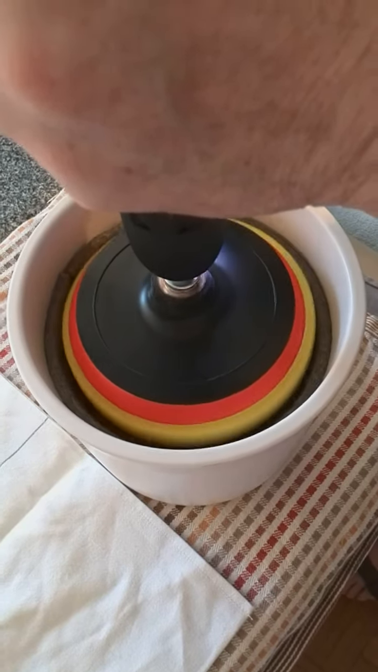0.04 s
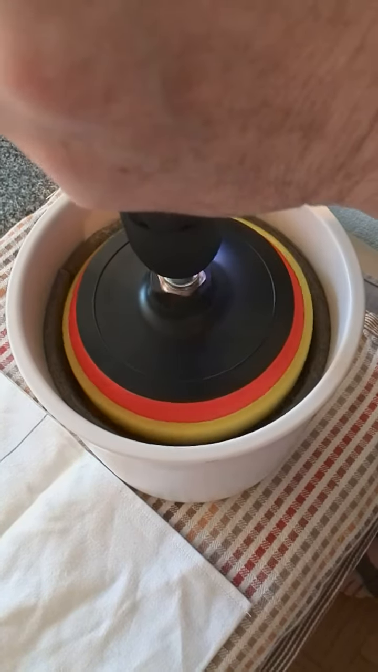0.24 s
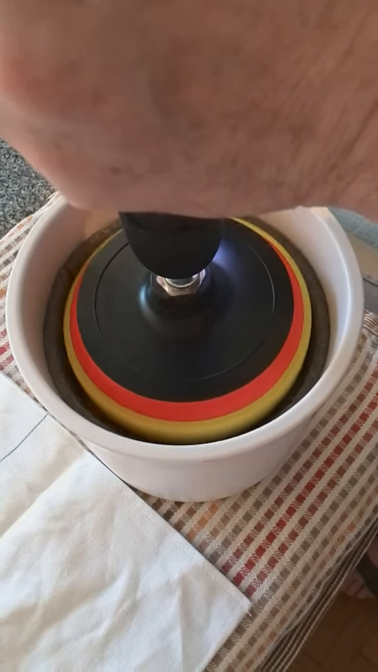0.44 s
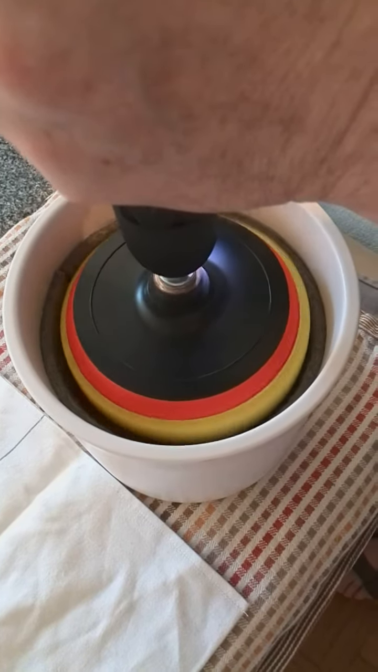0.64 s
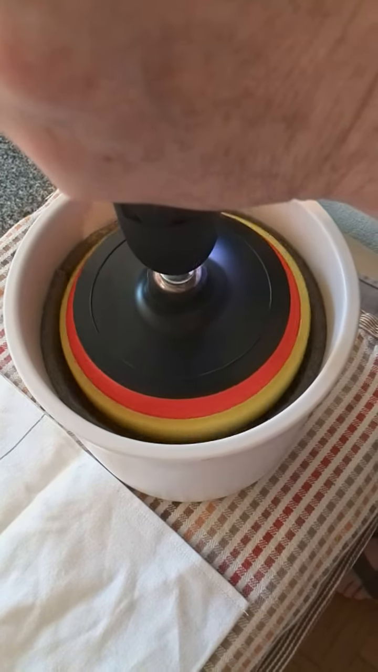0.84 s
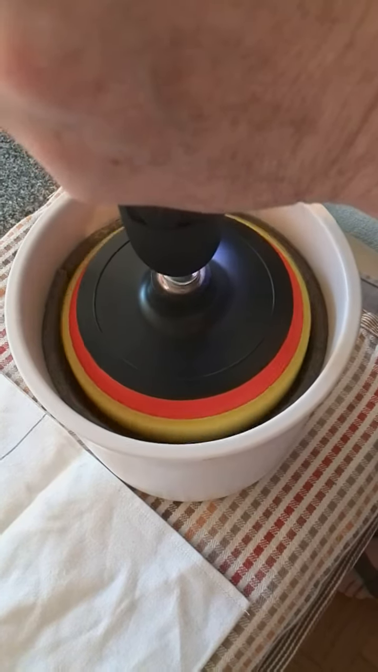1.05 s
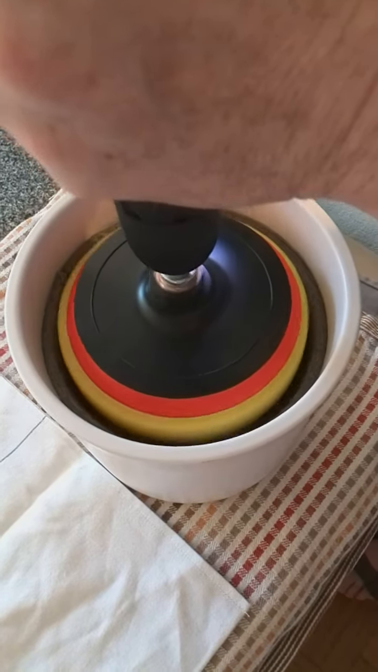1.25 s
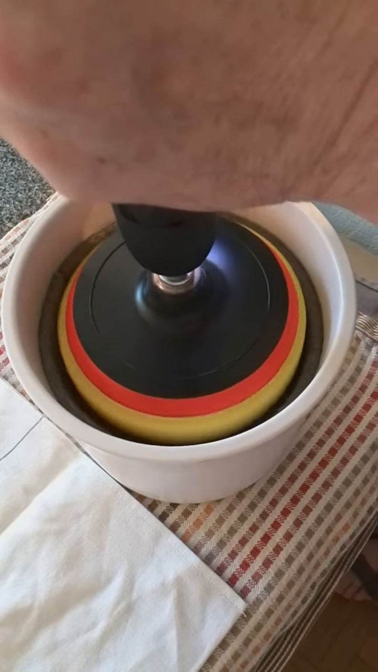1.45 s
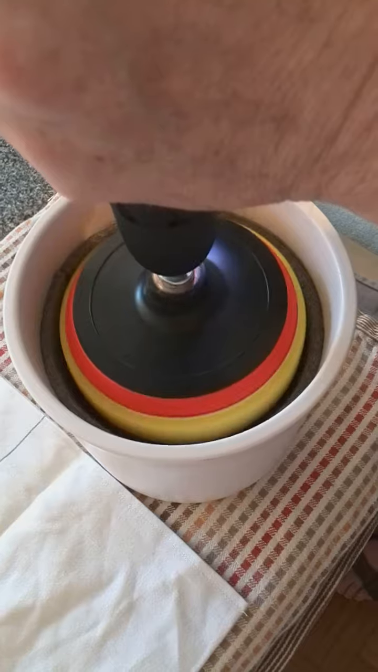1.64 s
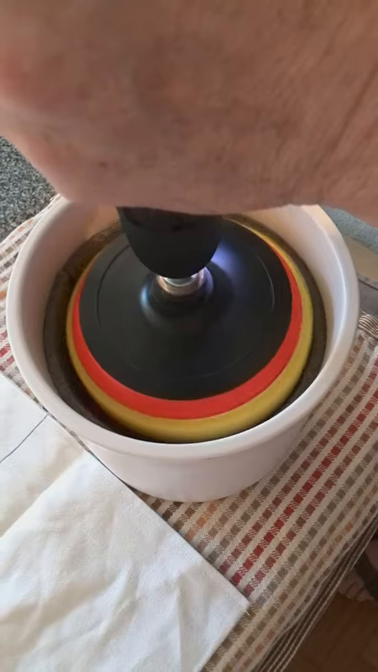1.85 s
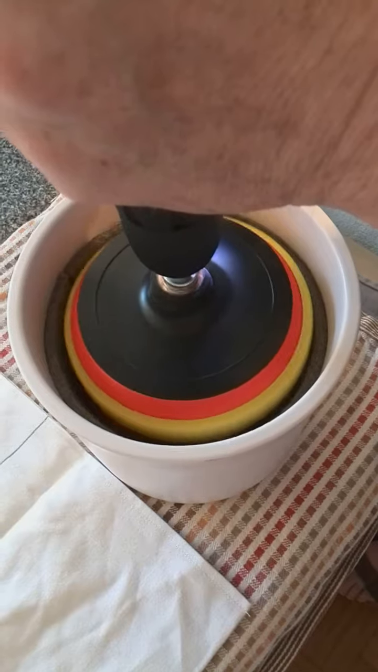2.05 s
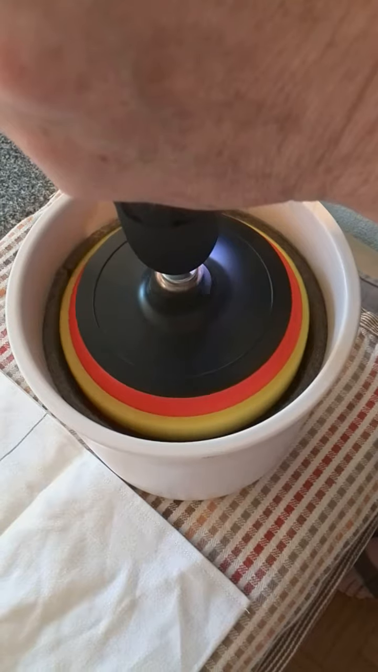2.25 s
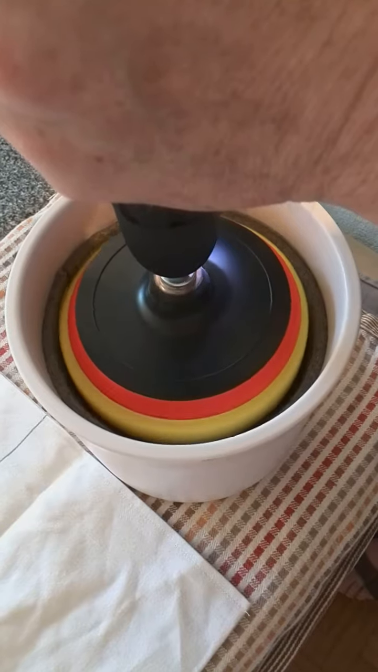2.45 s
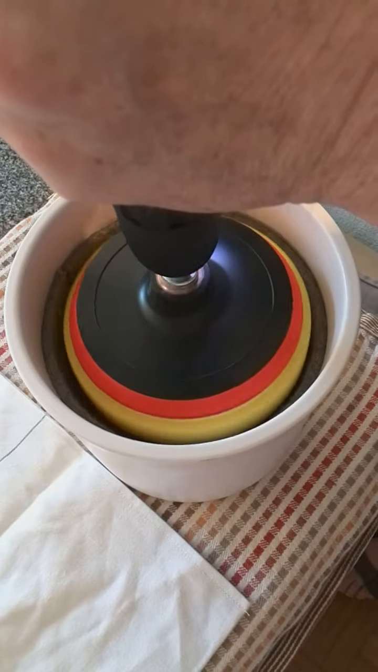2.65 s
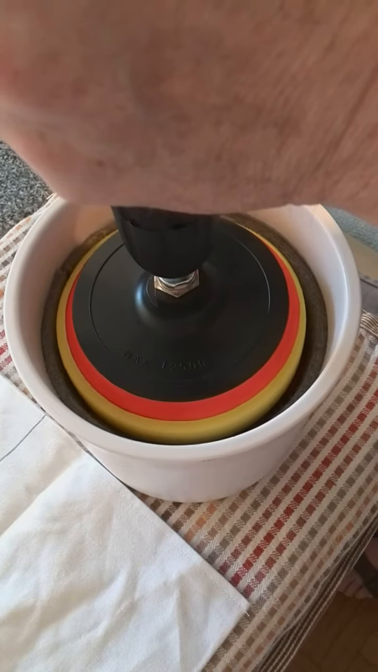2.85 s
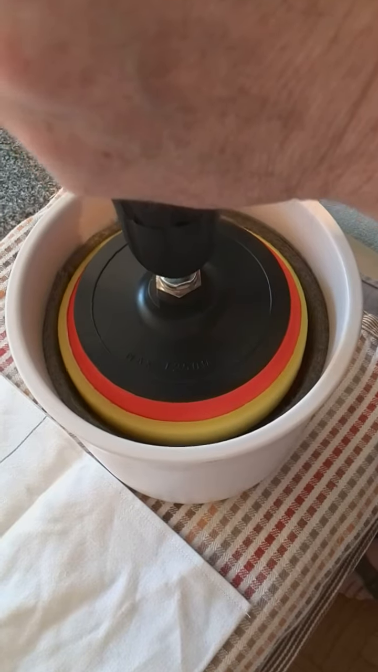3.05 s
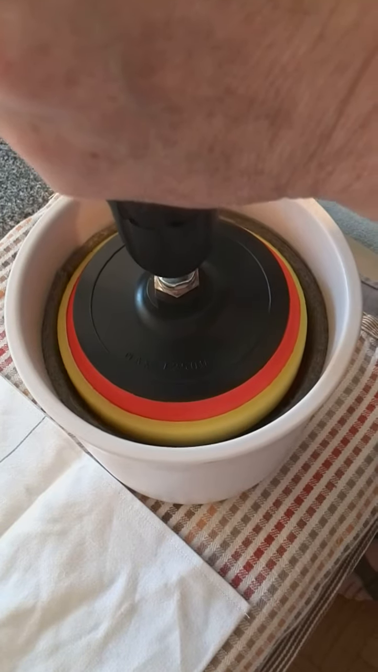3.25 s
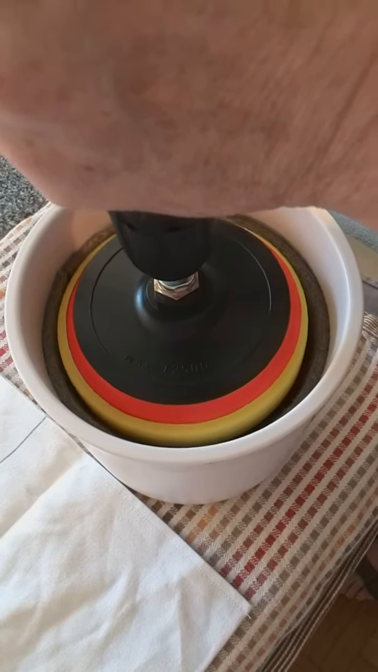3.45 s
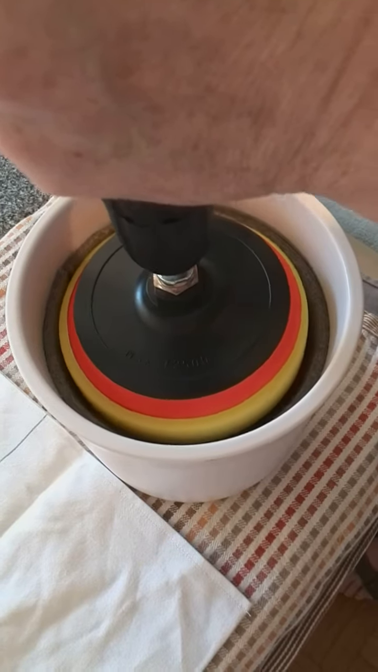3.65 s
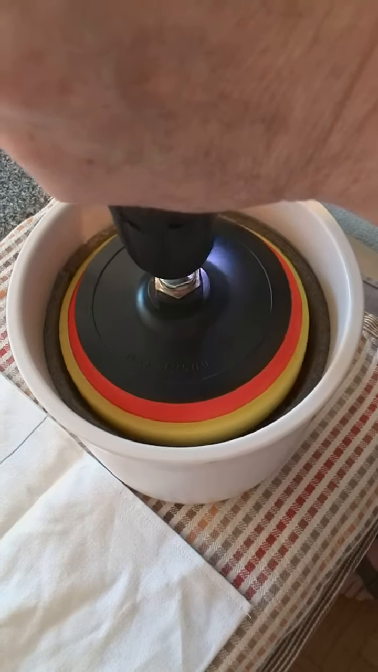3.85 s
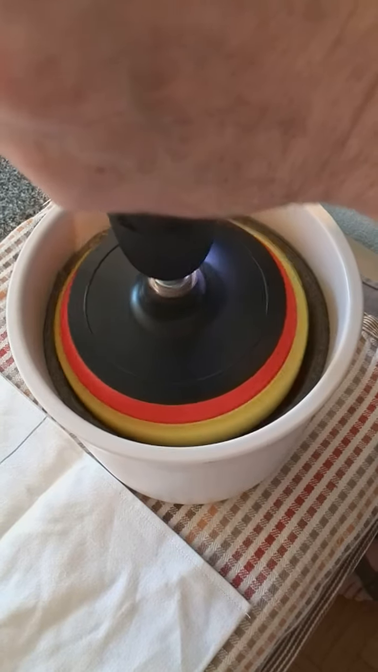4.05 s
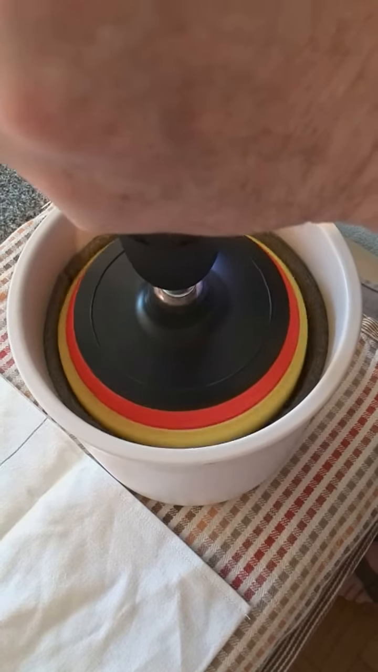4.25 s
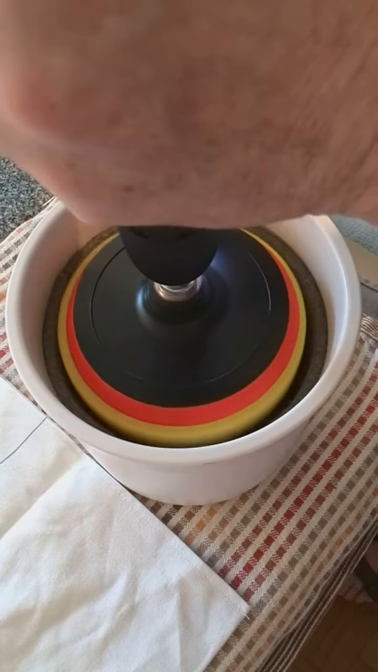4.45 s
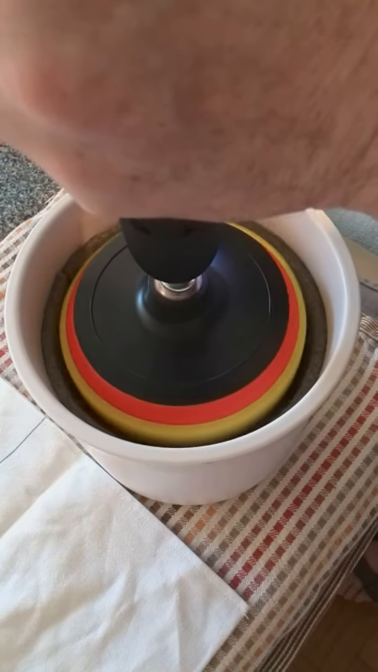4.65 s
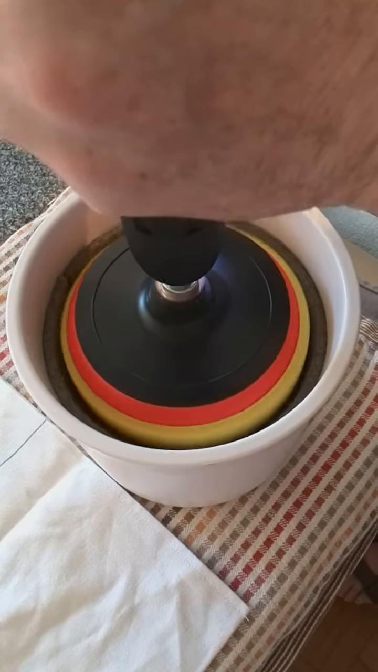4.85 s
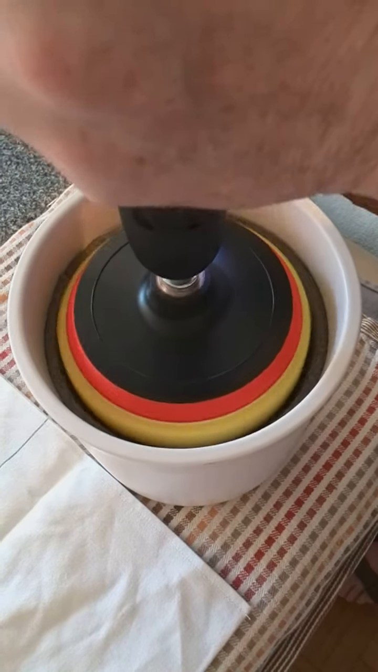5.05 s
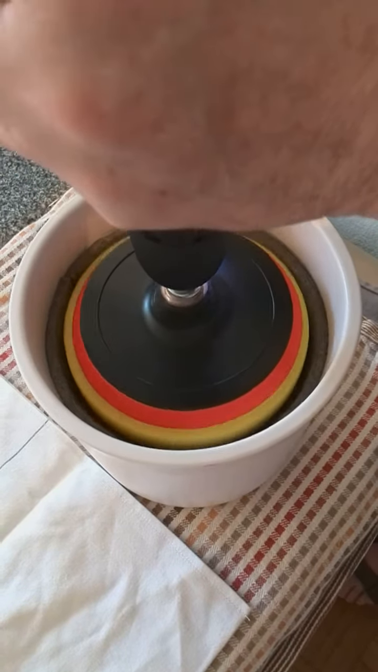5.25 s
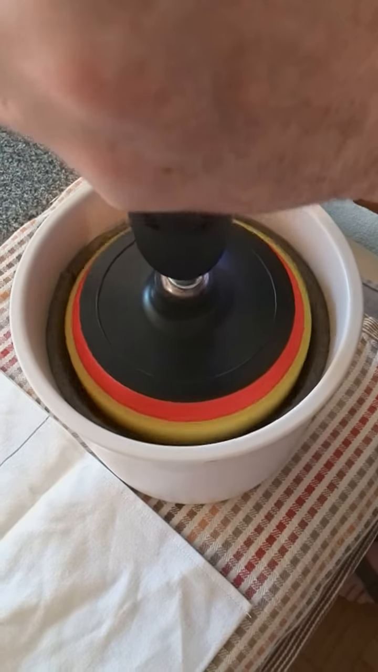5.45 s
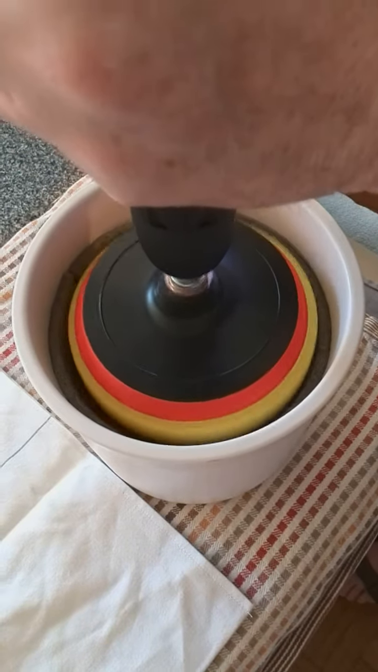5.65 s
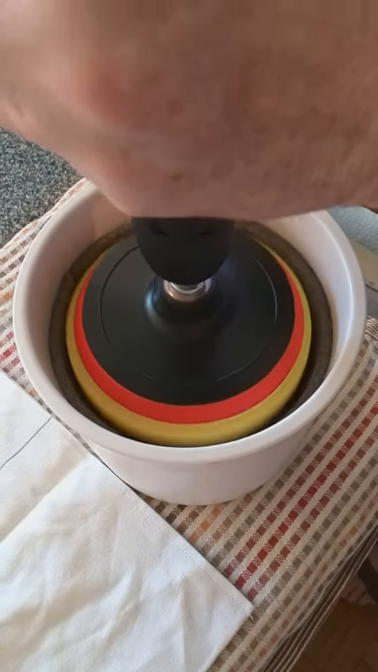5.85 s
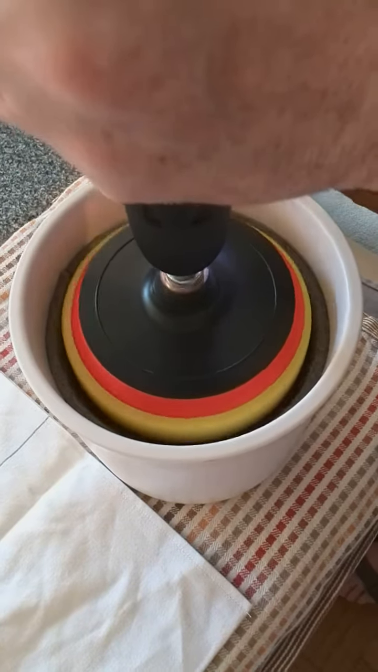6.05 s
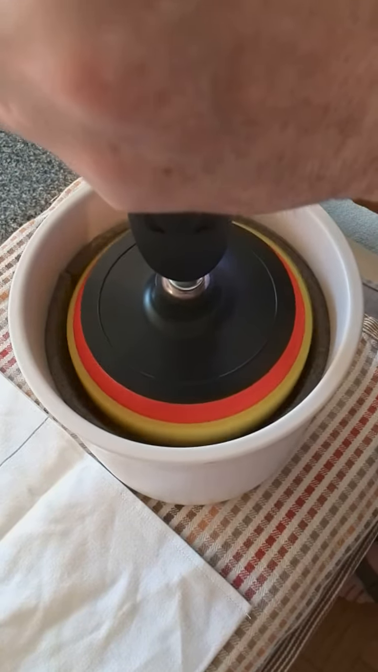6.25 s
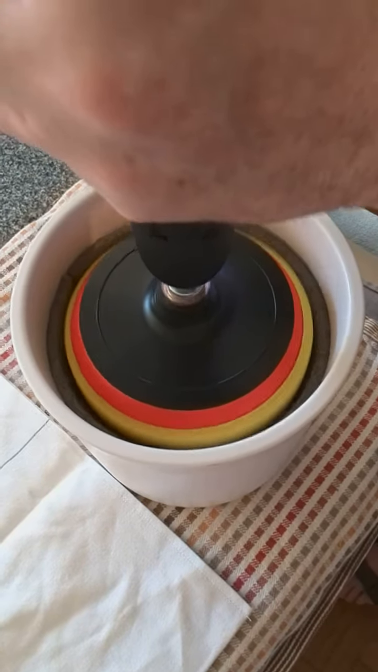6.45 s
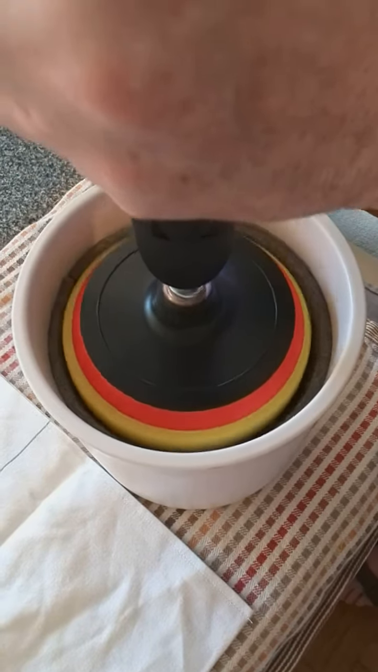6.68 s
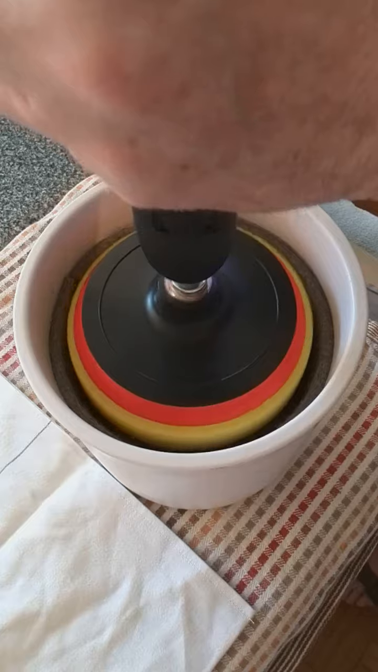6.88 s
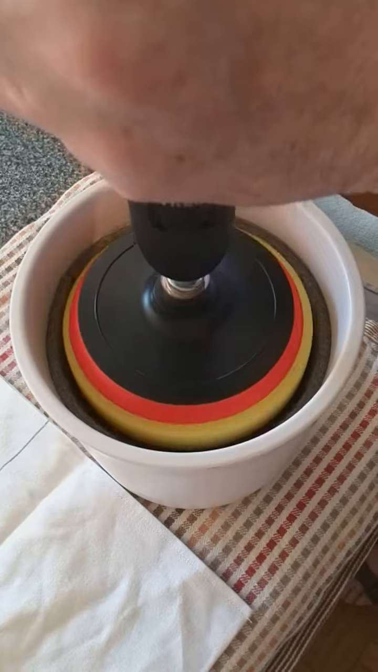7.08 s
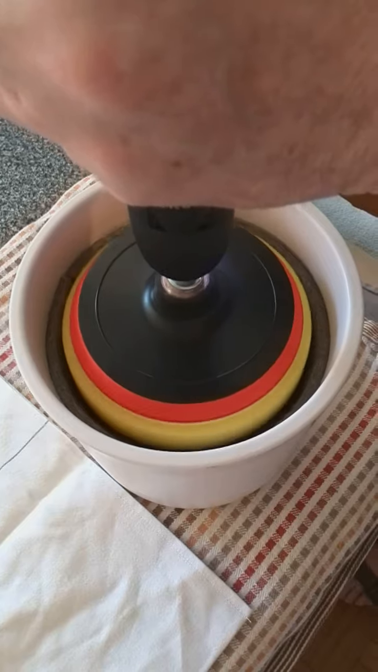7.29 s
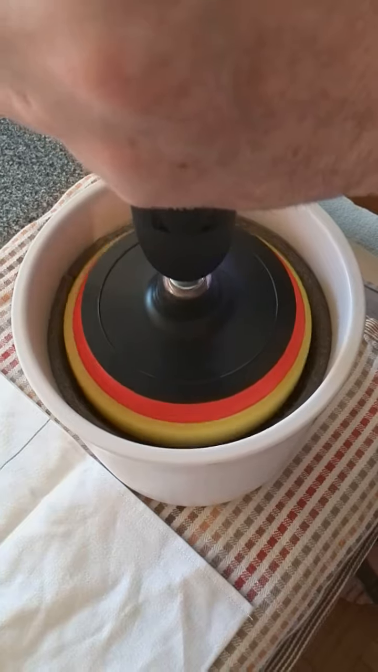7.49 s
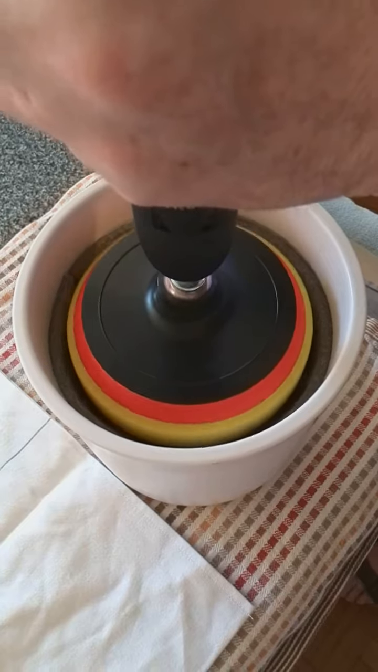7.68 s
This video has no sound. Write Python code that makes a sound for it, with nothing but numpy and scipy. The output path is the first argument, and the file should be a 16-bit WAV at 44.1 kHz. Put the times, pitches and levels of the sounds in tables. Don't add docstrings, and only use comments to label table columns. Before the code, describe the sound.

Very close stereo pickup in a small room with a short, bright echo and faint hiss. A drill is already running at the start: a high, dense whine inside a bright rush of brush, fan and gear noise. At about 0.3 s it brakes abruptly with a tiny falling chirp. At 0.45 s it restarts, short rising squeals over a quick spin-up of about a third of a second, then holds steady with slight flutter until 2.85 s, when it brakes again. In the quiet, clicks come at 2.9 and 3.05 s, a very loud snap at 3.57 s, then smaller rattles up to 4 s. From 3.95 s it creeps, squeals and spins up faster and higher, with more low rumble. From about 5 s the pitch wavers as balls circle, the wobble quickening and growing shallower. Soft dull knocks fall near 5.5, 6.0, 6.25 and 6.35 s. The whine is still running at the end, around 7.6 s.

```python
import sys
import numpy as np
from scipy import signal
from scipy.fft import rfft, irfft, next_fast_len
from scipy.io import wavfile
from scipy.ndimage import uniform_filter1d

SR = 44100
rng = np.random.default_rng(int(sys.argv[2]) if len(sys.argv) > 2 else 0)


def linear_from_db(decibels):
    return 10 ** (np.asarray(decibels, float) / 20)


def generate_wav(sig):
    pcm = np.round(np.clip(np.atleast_2d(sig).T, -1, 1) * 32767).astype(np.int16)
    wavfile.write(sys.argv[1], SR, pcm)


N = 340452
GEAR_CHANGE_S = 3.5


def evened(x):
    return x / np.sqrt(np.mean(x ** 2) + 1e-20)


def read(points, hz):
    f, value = np.transpose(points)
    return np.interp(np.log(hz + 1), np.log(f + 1), value)


def shaped(x, gain):
    size = next_fast_len(x.shape[-1] + 4096)
    spectrum = rfft(x, size) * gain(np.fft.rfftfreq(size, 1 / SR))
    return irfft(spectrum, size)[..., :x.shape[-1]]


def above(f, edge_hz):
    return 1 / (1 + (edge_hz / (f + 1)) ** 8)


def below(f, edge_hz):
    return 1 / (1 + ((f + 1) / edge_hz) ** 8)


def noise_pair(same):
    a, b = rng.standard_normal((2, N))

    def common(hz):
        return np.clip(read(same, hz), 0, 1)
    return np.array([a, shaped(a, common) + shaped(b, lambda hz: np.sqrt(1 - common(hz) ** 2))])


def drift(seconds, count=1):
    width = round(seconds * SR)
    noise = rng.standard_normal((count, N))
    return evened(uniform_filter1d(uniform_filter1d(noise, width), width))


# (frequency [Hz], level per Hz [dB])
AIR_COLOUR = [(100, 8), (200, 2.5), (310, -5.5), (900, -9), (2200, -11), (6000, -9), (9000, -11.5),
              (14000, -15), (14600, -39)]
# (frequency [Hz], left-right likeness [0-1])
AIR_SAME = [(120, 1), (220, .85), (500, .3), (3000, .05)]


def floor():
    air = evened(shaped(noise_pair(AIR_SAME), lambda f: linear_from_db(read(AIR_COLOUR, f)) * f ** 2 / (f ** 2 + 80 ** 2)))
    lumps = shaped(rng.standard_normal(N), lambda f: f ** 2 / (f ** 2 + 28 ** 2) / (1 + (f / 45) ** 2))
    pull, share = motion()[:2]
    rumble_db = np.transpose(RUN_LEVELS)[1][pull]
    shake = linear_from_db(-63.5) + running(pull) * share * linear_from_db(rumble_db)
    rumble = shake * linear_from_db(3.5 * drift(0.2)[0] - 6) * evened(lumps)
    return linear_from_db(-59.5 + 1.3 * drift(0.096)) * air + rumble


# (frequency [Hz], time to fall 60 dB [s])
ROOM_DECAY = [(300, 0.19), (800, 0.54), (2100, 0.38), (5500, 0.28), (11000, 0.24)]


def echoes():
    taps = np.zeros((2, SR // 2))
    at = np.arange(300, SR // 2 - 20, 20) + rng.integers(0, 20, (2, (SR // 2 - 301) // 20))
    np.put_along_axis(taps, at, rng.choice([-1., 1.], at.shape), 1)
    hz, t, z = signal.stft(taps, SR, nperseg=256)
    decay = linear_from_db(-60 * t / read(ROOM_DECAY, hz)[:, None])
    tail = signal.istft(z * decay, SR, nperseg=256)[1]
    return tail / np.linalg.norm(tail[0])


def room(x):
    turn = np.pi * np.arange(N) / SR * 1.3
    out = np.zeros((2, N))
    for k in range(3):
        part = x * np.cos(turn + k * np.pi / 3) * np.sqrt(2 / 3)
        out += signal.oaconvolve(part, echoes(), axes=1)[:, :N]
    return out


# (frequency [Hz], level [dB])
LEFT_PORT = [(100, -28.5), (330, -23), (550, -14.5), (950, -12.5), (1650, -12), (2150, -2), (2550, -8),
             (4300, -6.5), (6100, -1), (7800, -9.5), (9800, -4.5), (11000, -23), (13000, -10.5),
             (14300, -38.5)]
RIGHT_PORT = [(100, -25.5), (330, -23.5), (850, -17), (1280, -12.5), (1900, -14.5), (2300, -12),
              (2600, -24.5), (2950, -12), (4700, -21.5), (6200, -7.5), (7900, -9), (8900, 4), (12000, -14),
              (14300, -26)]
# (frequency [Hz], width [Hz], level [dB])
CAN_RINGS = [(4300, 210, 3.5), (6480, 100, 3.5), (7520, 340, 5.5), (8900, 340, -9)]


def port_db(side, f):
    rings = sum(db / (1 + (2 * (f - hz) / width) ** 2) for hz, width, db in CAN_RINGS)
    return read((LEFT_PORT, RIGHT_PORT)[side], f) + rings


# (time [s], peak level [dB], colour [Hz], left-right [dB], length [s])
SWITCH_CLICKS = [(2.889, -20.5, 3280, 0, 0.011), (3.059, -13, 4130, -0.5, 0.0046),
                 (3.254, -52, 4230, 7, 0.0045), (3.3548, -42, 4400, 29, 0.0028),
                 (3.3664, -46, 5050, 2.5, 0.0044), (3.4536, -24.5, 5750, 5, 0.0088),
                 (3.5703, -2.5, 4900, 8, 0.0056), (3.782, -37.5, 4410, 7, 0.0046),
                 (3.829, -33.5, 5860, 4, 0.016), (3.8576, -20, 5200, -1, 0.0066),
                 (3.9495, -31.5, 4430, 11, 0.0038), (3.9963, -23, 2660, 12, 0.012)]
# (time [s], peak level [dB], colour [Hz], left-right [dB], length [s])
BALL_KNOCKS = [
    (5.462, -16, 1300, 4.5, .014),
    (5.977, -20, 1200, 6, .008),
    (6.236, -19.5, 1100, 6, .011),
    (6.361, -19.5, 1200, 3, .009),
]


def clicks():
    near, spread, t = np.zeros((2, N)), np.zeros((2, N)), np.arange(1024) / SR
    for s, db, hz, pan_db, length in SWITCH_CLICKS + BALL_KNOCKS:
        rattle = rng.standard_normal((2, 1024))
        rattle = rattle[0] * 0.51 + rattle
        top_hz = 1.7 * hz * linear_from_db(.25 * (db + 38))
        u = t / max(length, .001)
        slip = 0.33 * np.minimum(u / 0.15, 1)
        body = (slip + (u > .4)) * np.exp(-2.6 * np.maximum(u - .5, 0))
        for side, sign in enumerate((1, -1)):
            def way(f):
                ring = .5 + 1 / (1 + ((f - hz) / (.5 * hz)) ** 2)
                shell = f / np.hypot(f, 1500) * ring / (1 + (f / top_hz) ** 4)
                return shell * linear_from_db(0.54 * port_db(side, np.maximum(f, 1000)))
            snap = shaped(rattle[side] * body, way)
            pulse = shaped(signal.unit_impulse(1024, 100), way)
            snap = snap / abs(snap).max()
            near[side, round(s * SR):][:1024] += snap * linear_from_db(db + 1 + sign * pan_db / 2)
            spread[side, round(s * SR):][:1024] += evened(pulse) * snap.std() * linear_from_db(db + sign * pan_db / 4)
    return near, spread


# (time [s], length [s], from [Hz], to [Hz], level [dB])
SQUEAL_GLIDES = [(.498, .066, 870, 1230, -27), (.52, .03, 3250, 4000, -33), (.543, .058, 2700, 4150, -30),
                 (.55, .12, 430, 790, -39), (.572, .07, 1040, 1430, -28.5), (1.4, .04, 1380, 1620, -33),
                 (3.998, .05, 920, 1320, -34), (3.998, .04, 3250, 5000, -34), (4.012, .05, 2600, 3750, -33),
                 (4.05, .09, 520, 900, -36), (5.875, .04, 1400, 1430, -30)]
# (time after release [s], length [s], from [Hz], to [Hz], level [dB])
BRAKE_SONG = (.006, .018, 930, 600, -18)
# (starting frequency [Hz], left-right [dB])
SQUEAL_PAN = [(880, 5), (900, 0), (1500, 0), (2500, 5)]


def squeals():
    out = np.zeros((2, N))
    brakes = [(released + BRAKE_SONG[0], *BRAKE_SONG[1:]) for _, released, _, _ in TRIGGER_PULLS[:-1]]
    for s, length, from_hz, to_hz, db in SQUEAL_GLIDES + brakes:
        pan_db = read(SQUEAL_PAN, from_hz)
        turn = 2 * np.pi * np.cumsum(np.linspace(from_hz, to_hz, round(length * SR))) / SR
        tone = np.sin(turn) + .12 * np.sin(2 * turn + 1)
        tone = tone * signal.windows.tukey(len(turn), min(.35 + 8 * length, 1))
        out[:, round(s * SR):][:, :len(turn)] += tone * linear_from_db([[db + pan_db / 2], [db - pan_db / 2]])
    return out


# (pulled [s], released [s], free speed [turns per s], spin-up stretch [ratio])
TRIGGER_PULLS = [
    (-1, .275, 312, 1),
    (.45, 2.84, 312, 1),
    (3.94, 9, 336.9, .87),
]
# (time after the pull [s], share of free speed [0-1])
SPIN_UP_CURVE = [(0, .04), (.04, .22), (.051, .29), (.091, .386), (.151, .62), (.227, .89), (.267, .954),
                 (.3, .982), (.36, 1)]
# (time [s], laps done [count])
BALL_LAPS = [(4.3, 0), (4.94, .5), (5.17, 1), (5.7, 2), (6.15, 3), (6.47, 4), (6.72, 5), (6.906, 6),
             (7.076, 7), (7.715, 11)]


def motion():
    t = np.arange(N) / SR
    pulled, released, free_hz, stretch = np.transpose(TRIGGER_PULLS)
    pull = np.searchsorted(pulled, t) - 1
    share = np.interp((t - pulled[pull]) / stretch[pull], *np.transpose(SPIN_UP_CURVE))
    laps = uniform_filter1d(np.interp(t, *np.transpose(BALL_LAPS)), 4400)
    pace = np.maximum(uniform_filter1d(np.gradient(laps) * SR, 8800), 2)
    braked = np.clip(1 - 20 * (t - released[pull]), .3, 1)
    grip = (t > GEAR_CHANGE_S) * np.interp(t, [4.85, 5.2], [.22, 1])
    swing = grip * (pace / 2) ** -1.45 * np.cos(2 * np.pi * laps)
    return pull, share, swing, braked * share * free_hz[pull] + 13.4 * swing


def running(pull):
    t = np.arange(N) / SR
    pulled, released = np.transpose(TRIGGER_PULLS)[:2]
    soft_start_s, brake_s, switch_s = .022, .03, .006
    rise = (t - pulled[pull]) / soft_start_s
    fall = (released[pull] + brake_s - t) / switch_s
    creep_db = -7 * ((t > GEAR_CHANGE_S) & (t < 3.995))
    return np.clip(np.minimum(rise, fall), 0, 1) * linear_from_db(creep_db)


def torque_db(order, hz, load):
    if order == 3:
        return load * 2
    if order == 10.8:
        return load * np.where(hz > 318, 6, -9)
    return load * (-17 if order > 11 else -2)


# (multiple of rotor speed [ratio], slow gear left [dB], slow gear right [dB],
# fast gear left [dB], fast gear right [dB])
WHINE_LINES = [(1, -19, -19, 3, 4), (2, -11, -19, -10, -15), (3, -6, 2, -1, -3), (3.8, -10, -11, -19, -13),
               (9, -9, -6, -11, -8), (10.8, -8, -11, -4, -11), (12, -5, -8, 1, -3), (15, -3, -7, -8, -8),
               (18, -2, -9, 4, 2), (20, -5, -10, -10, -14), (21, 2, -4, -4, -4), (24, -8, -7, -4, -6),
               (27, -5, -4, -6, -4), (27.2, -10, -1, -19, -19), (29, -19, -16, -5, -5),
               (30, -8, -8, -8, -8), (33, -19, -12, -7, -6), (35, -5, -19, -2, -4), (36, -10, -19, -2, -4),
               (37, -9, -11, -4, -4), (38, -11, -11, -4, -6), (39, -2, -6, -3, -9), (41, -11, -15, -3, -5),
               (42, -4, -8, 1, -3)]


def whine(hz, turns):
    fast, out = np.arange(N) > GEAR_CHANGE_S * SR, np.zeros((2, N))
    one_spacing = np.sqrt(3 * 325 / (SR / 2))
    load = np.clip(np.where(fast, (337 - hz) / 14, (308 - hz) / 110), 0, 1)
    flicker = linear_from_db(2.8 * drift(0.008, count=4))
    flicker[1] = 1
    for k, (order, *db) in enumerate(WHINE_LINES):
        if order < 3:
            effort = (hz / 325) ** 3
        else:
            effort = linear_from_db(torque_db(order, hz, load))
        tone = flicker[(k + 1) % 4] * effort * np.cos(2 * np.pi * (order * turns + rng.random()))
        out += np.where(fast, linear_from_db(db[2:])[:, None], linear_from_db(db[:2])[:, None]) * tone
    return one_spacing * out


# (hiss level [dB], rumble through table and hand [dB])
RUN_LEVELS = [
    (-21, -62),
    (-22, -62.5),
    (-20.5, -53),
]
# (frequency [Hz], share [0-1])
HISS_SAME = [(300, 1), (1200, 0.87), (2500, 0.17), (6200, 0.33), (8000, 0.1), (9500, 0.12), (11000, 0.077),
             (14000, 1)]


def drill():
    t = np.arange(N) / SR
    pull, share, swing, speed_hz = motion()
    unrest = np.where(t < GEAR_CHANGE_S, .003, .001) * drift(.03)[0]
    hz = uniform_filter1d(speed_hz, 900) * (1 + unrest)
    turns = np.cumsum(hz) / SR
    hiss = noise_pair(HISS_SAME) * (1 + .15 * np.cos(2 * np.pi * turns)) * linear_from_db(.8 * drift(.006))
    raw = hiss + whine(hz, turns)
    heard = np.array([shaped(raw[side], lambda f: linear_from_db(port_db(side, f))) for side in (0, 1)])
    fan = evened(shaped(heard, lambda f: above(f, 4000)))
    gears = evened(shaped(heard, lambda f: below(f, 4000) * above(f, 1100)))
    hum = evened(shaped(heard, lambda f: below(f, 1100)))
    slow, wander = np.clip(1 - share, 0, 1), drift(0.049, count=3)
    level_db = np.transpose(RUN_LEVELS)[0][pull] + 1.5 - 22.5 * slow ** 1.41
    level_db = level_db - 0.74 * swing + 0.66 * wander[0]
    gear_db = -10.5 + 7 * slow - 2.5 * swing + 1.25 * wander[1]
    hum_db = -22.5 + 12 * slow + 1.5 * wander[2]
    return running(pull) * linear_from_db(level_db) * (fan + gears * linear_from_db(gear_db) + hum * linear_from_db(hum_db))


# (frequency [Hz], phase [rad])
RIGHT_TRAIL = [(150, -2), (400, 1), (800, 0.4), (1400, -1.7), (2500, 0.02)]


def scene():
    motor, song, (taps, spread) = drill(), squeals(), clicks()
    sent = linear_from_db(-10) * motor + linear_from_db(-19) * song + linear_from_db(-5) * spread
    near = motor + song + taps + room(sent)
    lag_s = 16 / SR
    near[1] = shaped(near[1], lambda f: np.exp(-1j * (2 * np.pi * f * lag_s + read(RIGHT_TRAIL, f))))
    return near + floor()


def top_cut(x):
    return signal.sosfilt(signal.butter(12, 14450, fs=SR, output="sos"), x)


def record(dry):
    low_side = shaped((dry[0] - dry[1]) / 2, lambda f: 1 / (1 + (f / 190) ** 6))
    mix = np.clip(dry - [low_side, -low_side] + .0016, -1, 1)
    return top_cut(mix)


dry = scene()
out = record(dry)
generate_wav(out)
```